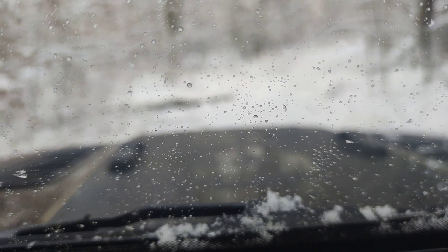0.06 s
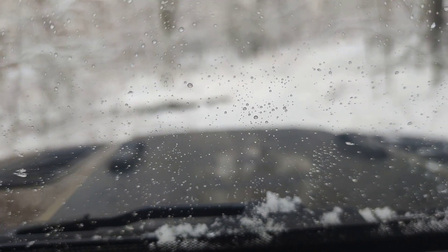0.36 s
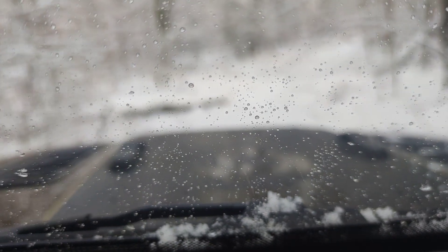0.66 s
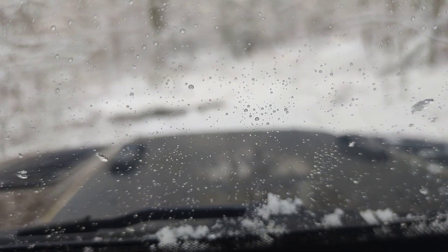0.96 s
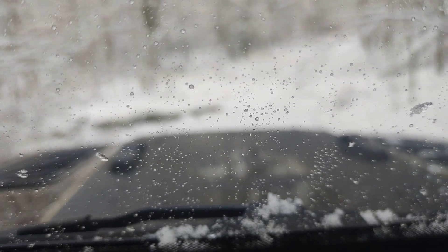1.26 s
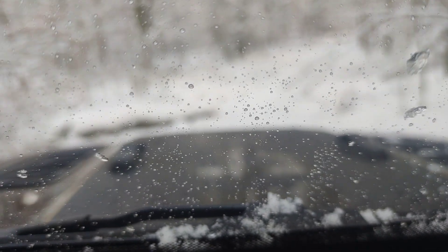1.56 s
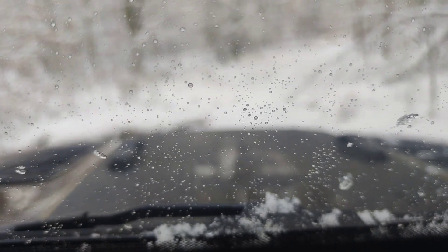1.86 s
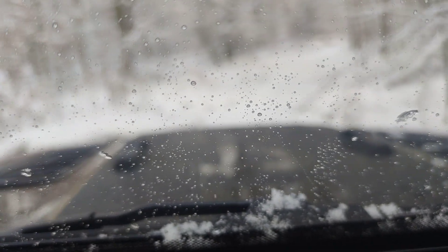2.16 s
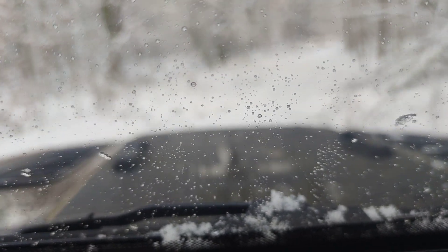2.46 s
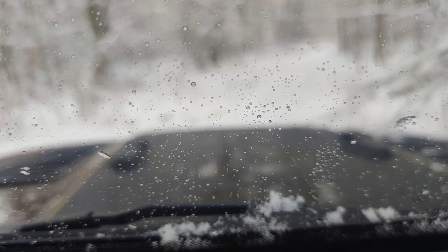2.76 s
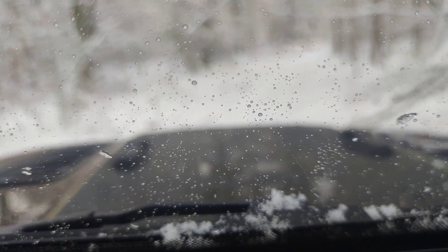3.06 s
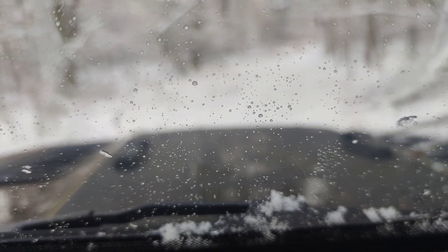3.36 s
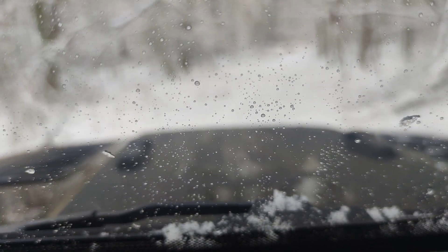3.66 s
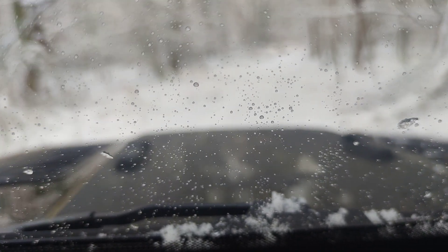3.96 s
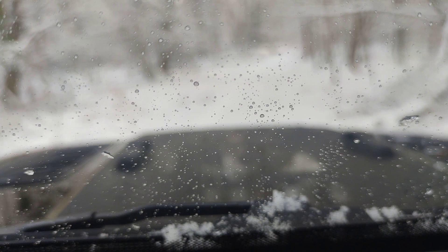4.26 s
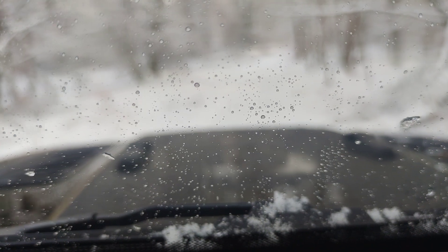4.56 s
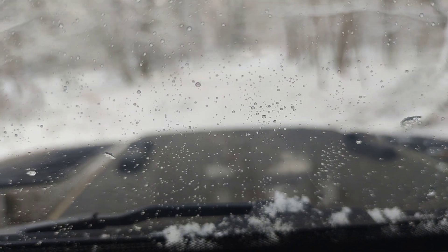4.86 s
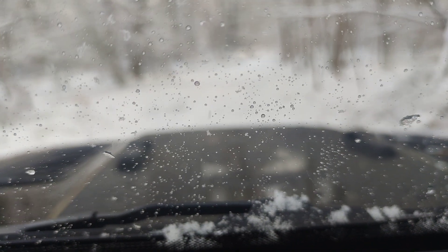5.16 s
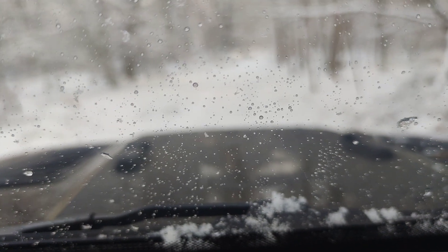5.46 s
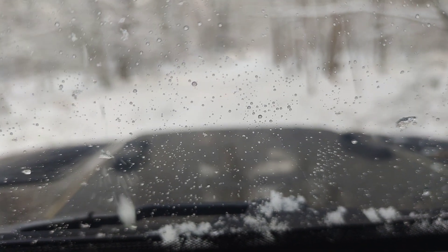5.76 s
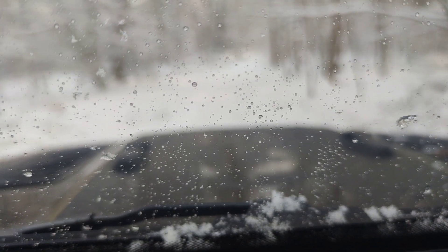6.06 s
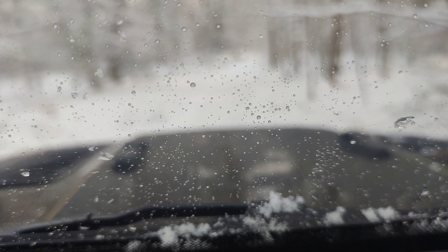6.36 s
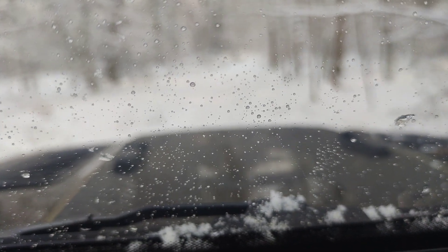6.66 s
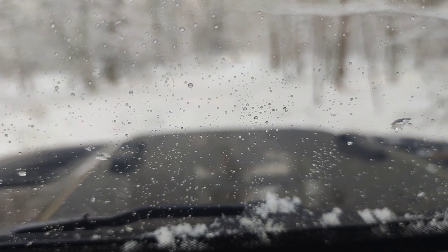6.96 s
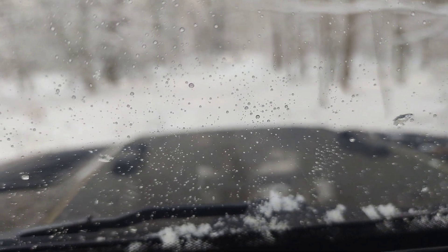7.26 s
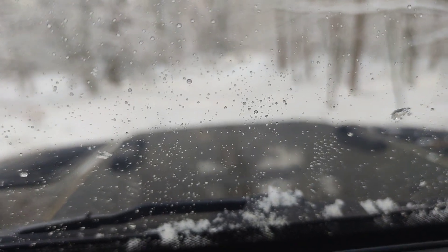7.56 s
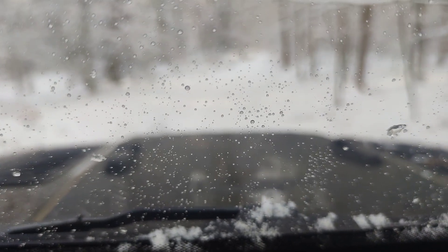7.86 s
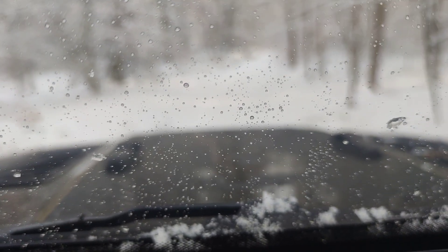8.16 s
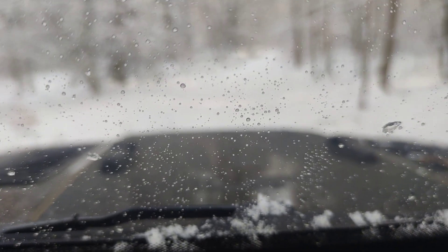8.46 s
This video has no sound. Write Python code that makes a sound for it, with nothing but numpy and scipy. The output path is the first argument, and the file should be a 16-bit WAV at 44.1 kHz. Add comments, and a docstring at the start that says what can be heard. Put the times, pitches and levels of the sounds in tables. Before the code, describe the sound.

Snow-laden branches swish and scrape along a slow truck, with ice ticking on the windscreen and sticks knocking on the panels. After this loud opening, twigs clatter in irregular bursts over a low engine drone, chassis rumble and the muffled crunch of tyres on snow. Towards the end the slaps grow sparse and the engine rises slightly twice. The microphone is inside the cab, on a forest track.

```python
"""A snowy forest track, heard from the dashboard inside the cab of a crawling truck.
The engine drones and revs briefly twice near the end; the chassis rumbles and the tyres crunch snow.
Snow-laden branches sweep over the body, ice ticks on the glass, and twigs, soft blows and sticks
strike the panels. The stereo microphone has two ports, each with its own treble resonance."""
import sys
import numpy as np
from scipy import signal
from scipy.fft import rfft, irfft, next_fast_len
from scipy.io import wavfile
from scipy.ndimage import uniform_filter1d, map_coordinates

SR = 44100
rng = np.random.default_rng(int(sys.argv[2]) if len(sys.argv) > 2 else 0)


def store_pcm(level_fs):
    """Save levels as 16-bit WAV."""
    pcm = np.round(np.clip(level_fs, -1, 1) * 32767).astype(np.int16)
    wavfile.write(sys.argv[1], SR, np.atleast_2d(pcm).T)


N = 375732

# Thickness of the brush. Each row: time in seconds, branch scrape in dB, snow hiss in dB.
BRUSH_THICKNESS = [(0, -35.5, -37), (.6, -35.5, -32.5), (1.3, -38.5, -28), (1.4, -45, -38), (1.6, -43, -38),
                   (1.85, -52, -42.5), (2.4, -59.5, -53), (2.75, -58, -50.5), (3.1, -60, -57),
                   (4.1, -52.5, -49.5), (4.7, -39, -47.5), (5.05, -48, -55), (5.6, -48.5, -52),
                   (6.4, -50.5, -47.5), (7.9, -50.5, -53), (8.1, -54.5, -48.5), (8.52, -55, -56.5)]


def amp(db):
    """Decibels to gain."""
    return 10 ** (np.asarray(db) / 20)


def along(points, hz):
    """Read (Hz, value) points on a log frequency axis."""
    freqs, values = np.transpose(points)
    return np.interp(np.log(hz + 1), np.log(freqs + 1), values)


def curves(rows):
    """One value per sample for each column after the time."""
    times, *columns = np.transpose(rows)
    return [np.interp(np.arange(N) / SR, times, column) for column in columns]


def wobble(rate):
    """A smooth random curve, rate knots a second."""
    coarse = np.arange(0, N, 64)
    knots = rng.standard_normal(size=1024)
    return np.interp(np.arange(N), coarse, map_coordinates(knots, [coarse * rate / SR], mode="wrap"))


def swell(peak_s, half_length_s):
    """A bell-shaped rise and fall of height 1."""
    offset = (np.arange(N) / SR - peak_s) / half_length_s
    return np.exp(-offset ** 2 / 2) * (np.abs(offset) < 5)


def add(out, start_s, sound):
    """Mix a sound in from start_s on."""
    part = out[:, max(round(start_s * SR), 0):][:, :sound.shape[-1]]
    part += sound[:, :part.shape[-1]]


def filtered(x, response):
    """Pass x through a response given as a function of Hz."""
    n = x.shape[-1]
    size = next_fast_len(n + 4096)
    return irfft(rfft(x, size) * response(np.fft.rfftfreq(size, 1 / SR)), size)[..., :n]


def port_lag(hz, lag_s=0.000435):
    """Sound reaches the right microphone port a little before the left."""
    return np.exp(np.pi * 1j * hz * lag_s * np.array([[-1], [1]]))


def port_spectra(pair, hz):
    """Mix two unrelated spectra to the ports: bass is shared, treble is diffuse."""
    # Likeness of the two ports. Each row: frequency in Hz, left-right correlation.
    likeness = [(40, 1), (120, 0.96), (250, 1), (500, 0.79), (1000, 0.24), (2000, 0.04), (5000, 0.011)]
    angle = np.arccos(np.clip(along(likeness, hz), -1, 1)) / 2
    shared, diffuse = pair * [np.cos(angle), np.sin(angle)]
    return np.array([shared + diffuse, shared - diffuse]) * port_lag(hz)


def in_cab(pair, spectrum):
    """Colour two unrelated signals and bring them to the ports; the mid signal has rms 1."""
    n = pair.shape[-1]
    size = next_fast_len(n, real=True)
    hz = np.fft.rfftfreq(size, 1 / SR)
    ports = irfft(port_spectra(rfft(pair, size), hz) * amp(along(spectrum, hz)), size)[:, :n]
    return ports / np.std(ports.mean(axis=0))


def patchy(depth_db, size=256):
    """Two noises whose colour shifts as the points of contact move."""
    frames = signal.stft(rng.standard_normal((2, N)), nperseg=size)[2]
    patches = uniform_filter1d(rng.standard_normal(frames.shape[1:]), size=4, axis=0)
    patches = uniform_filter1d(patches, size=8, axis=1)
    patches /= np.sqrt(np.mean(patches ** 2))
    return signal.istft(frames * amp(depth_db * patches), nperseg=size)[1][:, :N]


def grains(rate, spread_db, t60, share):
    """Envelope of rms 1: tiny dying impacts carry a share of the power, a steady bed the rest."""
    hits = rng.random(N) < rate / SR
    strength = amp(spread_db * np.minimum(rng.exponential(size=N), np.pi))
    decay = amp(-60 * np.arange(SR // 8) / SR / t60)
    power = np.abs(signal.fftconvolve(hits * strength ** 2, decay ** 2)[:N])
    return np.sqrt(1 - share + share * power / power.mean())


def pedal(coast_db=-52, ramp_s=0.1):
    """Half the firing rate (Hz) and firing level (dB): each push holds the load up and may bend the revs."""
    # Cruising speed of the engine. Each row: time in seconds, half the firing rate in Hz.
    cruise = [(0, 66.87), (1.5, 66.2), (2.5, 66.1), (3.1, 67.9), (3.85, 68.2), (4.2, 65.34), (5.1, 64.78),
              (6.6, 64.17), (7.3, 64.17), (7.5, 59.2), (7.7, 63.88), (8.28, 65.9), (8.52, 65.8)]
    # Pedal pushes. Each row: start and end in seconds, added firing note in dB, speed change in Hz.
    pushes = [(-.1, 1, -43.5, 0.5), (.22, 0.53, -41, 1.5), (1.1, 4.5, -48.5, 0), (4.5, 4.95, -41, 0),
              (5.36, 5.83, -40, 2), (5.92, 6.86, -53, 0), (6.862, 7.3, -40.5, 6.5), (7.681, 8.2, -39.5, 7),
              (8.231, 8.9, -40.5, -1.5)]
    t = np.arange(N) / SR
    speed, note = curves(cruise)[0], amp(coast_db)
    for start, end, db, change_hz in pushes:
        load = np.clip(np.minimum(t - start, end - t) / ramp_s + .5, 0, 1)
        progress = np.clip((t - start) / (end - start), 0, 1)
        note = note + amp(db) * load
        speed = speed + change_hz * np.sin(np.pi * progress)
    return speed, 20 * np.log10(note)


def engine(firing_db=1.14, throb_db=-1.0, whine_db=0.5, rough_db=2.0, flutter_db=1.86,
           jitter_rad=0.054, whine_db_per_hz=0.2):
    """Eight cylinders fire four times a turn; their unevenness adds the other crank orders."""
    # Exhaust throb. Each row: time in seconds, level in dB.
    exhaust = [(0, -35.5), (.7, -45), (4, -42), (4.7, -38.5), (5.5, -36.5), (6.8, -37), (8.52, -44)]
    # Uneven firing. Each row: multiple of the crank rate, relative level in dB.
    crank_orders = [(1, 2.5), (2, 1), (3, -8), (5, -12), (6, -17), (7, -21), (8, -17), (9, -15.5),
                    (10, -25), (11, -30.5), (12, -30)]
    speed, note_db = pedal()
    low_db = curves(exhaust)[0] + throb_db
    high_db = note_db + whine_db + whine_db_per_hz * (speed - speed.mean())  # grows with load and speed
    crank = 2 * np.pi * np.cumsum(speed / 2) / SR + jitter_rad * wobble(22)
    sound = amp(note_db + firing_db + rough_db * wobble(30)) * np.sin(4 * crank)
    for order, db in crank_orders:
        level = amp((low_db if order < 6 else high_db) + db + flutter_db * wobble(5.7))
        sound += level * np.sin(order * crank + 2 * np.pi * rng.random())
    return np.sqrt(2) * sound


def wheels(rumble_db=-1, crunch_db=1):
    """Under the cab the chassis rumbles over ruts while the tyres pack snow in dull little collapses."""
    # Track roughness and single ruts. Each row: time in seconds, rumble in dB, crunch in dB.
    roughness = [(0, -29, -36.5), (1.5, -36, -36), (1.8, -46, -48.5), (2.6, -40, -51.5), (4.2, -44, -47),
                 (4.65, -35, -45.5), (5.7, -38, -41), (6.25, -40, -48), (7.1, -31.5, -44),
                 (7.5, -36.5, -46), (8.52, -36.5, -51)]
    ruts = [(.88, -34.5, -74), (2, -31, -51), (3.58, -33, -70), (4.62, -38, -44), (5.32, -35, -52),
            (5.97, -41, -38), (6.92, -37, -49.5), (7.85, -31.5, -62), (8.46, -29, -62)]
    # Chassis and tyre spectra. Each row: frequency in Hz, relative level in dB.
    rumble_spectrum = [(8, -3), (18, -1), (28, -2.5), (40, 1), (50, 0), (78, -9), (112, -12.5),
                       (165, -20.5), (260, -64), (500, -87)]
    crunch_spectrum = [(90, -19), (150, -2.5), (200, 0.5), (260, -3.5), (340, 0), (480, -7), (700, -13.5),
                       (1200, -23), (3000, -43)]
    shake, packing = amp(curves(roughness))
    for time, chassis_db, tyre_db in ruts:
        crossing = swell(time, half_length_s=0.065)
        shake += amp(chassis_db) * crossing
        packing += amp(tyre_db) * crossing
    rumble = in_cab(rng.standard_normal((2, N)), rumble_spectrum)
    collapses = patchy(depth_db=3, size=1024) * grains(rate=70, spread_db=-1, t60=0.079, share=0.57)
    crunch = in_cab(collapses, crunch_spectrum)
    return amp(rumble_db) * shake * rumble + amp(crunch_db) * packing * crunch


def branches(scrape_db=2.5, hiss_db=1, pressure_depth_db=-0.24):
    """Twigs drag over the paint in small catches and shed a spray of snow; whole boughs swell and pass."""
    # Passing boughs. Each row: peak time in seconds, scrape in dB, spray in dB, half-length in seconds.
    boughs = [(0.255, -32, -25, 0.15), (0.488, -38, -34.5, 0.048), (1.068, -35.5, -30, 0.028),
              (1.244, -35.5, -53, 0.042), (1.543, -37, -28.5, 0.041), (1.647, -46, -33.5, 0.015),
              (1.719, -34, -59, 0.0096), (1.855, -52, -30, 0.0093), (2.065, -41, -33, 0.018),
              (2.184, -43.5, -34, 0.037), (2.897, -33.5, -33.5, .011), (3.312, -47, -40, 0.017),
              (4.394, -51, -60, 0.079), (5.067, -40.5, -59, 0.014), (5.245, -42.5, -42.5, 0.018),
              (5.402, -39, -48, 0.023), (5.957, -42, -59, 0.041), (6.195, -40, -56, 0.019),
              (6.336, -37, -58, .012), (6.746, -42.5, -59, 0.029), (7.239, -35.5, -46, 0.033),
              (8.31, -48, -39, 0.017)]
    # Branch and snow spectra. Each row: frequency in Hz, relative level in dB.
    scrape_spectrum = [(250, -2), (500, -3), (800, -2), (1300, -0.5), (2000, -3), (3000, -4), (5000, -10.5),
                       (9000, -16), (16000, -20)]
    hiss_spectrum = [(800, -46), (2000, -11), (3500, -2.5), (6000, -4), (8000, 2.5), (10000, -1),
                     (13000, -1.5), (16000, 1)]
    twig_db, snow_db = curves(BRUSH_THICKNESS)
    pressure_db = pressure_depth_db * wobble(22)
    drag = amp(twig_db + scrape_db + pressure_db)
    spray = amp(snow_db + hiss_db + pressure_db / 2)
    for time, drag_db, spray_db, half_length in boughs:
        contact = swell(time, half_length)
        drag += amp(drag_db) * contact
        spray += amp(spray_db) * contact
    catches = patchy(depth_db=3, size=512) * grains(rate=130, spread_db=3.5, t60=0.067, share=0.71)
    powder = patchy(depth_db=2.5) * grains(rate=280, spread_db=9.5, t60=0.079, share=0.34)
    return drag * in_cab(catches, scrape_spectrum) + spray * in_cab(powder, hiss_spectrum)


def glass_ticks(level_db=-13, follow=0.76):
    """Stray twig tips and crumbs of ice tick on the glass, harder in thick brush."""
    # Spectrum of the ticks. Each row: frequency in Hz, relative level in dB.
    tick_spectrum = [(500, -44), (1300, -18), (2500, -10), (6000, -1.5), (9000, 2), (16000, -1)]
    snow_db = curves(BRUSH_THICKNESS)[1]
    noise = in_cab(patchy(depth_db=4.5), tick_spectrum)
    ticks = noise * grains(rate=22, spread_db=-2.0, t60=0.1, share=1)
    return amp(level_db + follow * snow_db) * ticks


def panel_ring(bands, size, uneven_db=2.0, spacing_hz=260):
    """Dense panel modes in (dB, spectrum) bands, with new peaks for every spot that is struck."""
    hz = np.fft.rfftfreq(size, 1 / SR)
    peaks = rng.standard_normal(size=512)
    ripple_db = uneven_db * np.interp(hz / spacing_hz, np.arange(len(peaks)), peaks)
    modes = port_spectra(rfft(rng.standard_normal((2, size))), hz) * amp(ripple_db)
    mid, colour = np.abs(modes.mean(axis=0)), 0
    for db, spectrum in bands:
        gain = amp(along(spectrum, hz))
        colour = colour + amp(db) * gain / np.linalg.norm(mid * gain)
    return irfft(modes * colour, size) * size / np.sqrt(2)


def twigs(knock_db=3, clack_db=2.5, snap_db=3, crack_db=3, crack_t60=0.0075,
          cab_db=-20, cab_t60=0.15, crumble_db=2.0, attack_s=0.0011):
    """Each slap is a short crack, a crumbling rattle of twig tips on the panel and a faint cab echo."""
    # Twig slaps. Each row: start in seconds, knock, clack and snap in dB, rattle t60 in seconds.
    slaps = [(.104, -49, -37.5, -31, 0.61), (.16, -46, -27, -35, .3), (.238, -27.5, -31, -33, .09),
             (.361, -52, -22.5, -33, 0.13), (.447, -45, -29, -24.5, 0.15), (.574, -35, -39, -34, 0.56),
             (.654, -29.5, -41, -37, .09), (.769, -43, -53, -27, 0.06), (1.032, -42, -27, -23.5, .04),
             (1.043, -49, -36, -21, 0.055), (1.09, -28.5, -45, -34, 0.14), (1.403, -56, -40, -33, 0.41),
             (1.439, -32.5, -26, -21.5, .11), (1.48, -36, -24.5, -18.5, .1),
             (1.9, -41.5, -42.5, -30.5, 0.12), (2.097, -35.5, -51, -36.5, 0.12),
             (2.166, -47, -40.5, -31.5, 0.2), (2.275, -45.5, -43, -25, 0.07),
             (2.837, -37.5, -43, -31, 0.071), (2.897, -45, -54, -32, 0.17), (2.967, -48, -50.5, -39, 0.1),
             (3.247, -64, -44.5, -44, 0.072), (3.344, -37, -35.5, -44, 0.13), (3.363, -49, -38, -38, 0.15),
             (3.402, -44, -31.5, -45, 0.14), (3.432, -42, -34, -36, 0.052), (3.463, -43.5, -44, -48, 0.18),
             (3.637, -33.5, -39.5, -46, 0.08), (3.694, -53, -54, -37, 0.33), (3.794, -48, -41, -30.5, 0.12),
             (3.914, -51, -69, -31, 0.094), (4.044, -37, -44, -54, 0.072), (4.188, -34.5, -48, -40, 0.08),
             (4.218, -43, -37, -35, 0.082), (4.247, -31.5, -35.5, -55, 0.11), (4.389, -33, -30, -43, 0.051),
             (4.414, -51, -26, -36.5, 0.042), (4.433, -37.5, -36, -27, 0.068),
             (4.534, -37, -30, -25, 0.082), (4.573, -31, -24, -25.5, 0.086), (4.626, -60, -32, -36.5, .13),
             (4.708, -51, -44, -40, 0.23), (4.827, -37.5, -33, -46, .12), (4.878, -45, -40, -43, 0.17),
             (5.344, -39, -46, -40.5, 0.24), (5.409, -38, -45, -36, 0.11), (5.45, -42, -37.5, -51, 0.2),
             (5.537, -64, -38, -39, 0.078), (6.114, -37, -40, -38, 0.077), (6.248, -41, -40, -35, 0.11),
             (6.372, -37, -36.5, -45, 0.094), (6.675, -50, -43.5, -41.5, 0.14),
             (6.829, -40.5, -41, -35.5, .07), (6.899, -60, -60, -35, 0.034), (7.068, -36.5, -38, -39, 0.15),
             (8.356, -50, -46.5, -36, 0.19)]
    # Low, middle and high bands of a slap. Each row: frequency in Hz, relative level in dB.
    knock_band = [(120, -12), (300, 2.5), (700, -4), (1200, -3), (2500, -25)]
    clack_band = [(600, -51), (1300, -9.5), (2100, 1.5), (3300, 0), (6000, -14.5)]
    snap_band = [(1800, -45.5), (3800, -3), (6500, 2), (8500, 3.5), (11000, -1.5), (16000, -6)]
    out, t = np.zeros((2, N)), np.arange(8192) / SR
    crack = amp(crack_db - 60 * t / crack_t60)
    echo = amp(cab_db - 60 * t / cab_t60)
    onset = 1 - np.exp(-t / attack_s)
    for start, knock, clack, snap, t60 in slaps:
        bands = [(knock + knock_db, knock_band), (clack + clack_db, clack_band),
                 (snap + snap_db, snap_band)]
        ring = panel_ring(bands, size=len(t))
        crumble = amp(crumble_db * map_coordinates(rng.standard_normal(size=128), [t * 300], order=1))
        rattle = crumble * amp(-60 * t / t60)
        add(out, start, ring * (crack + rattle + echo) * onset)
    return out * amp([[-0.5], [0.5]])  # slightly right of centre


def resonance(hz, t, skirt_db):
    """Noise ringing in one broad resonance at hz, falling away in steps of skirt_db to each side."""
    shape = [(hz / 3, 4 * skirt_db), (hz * 0.77, skirt_db), (hz, 0),
             (hz * 1.16, skirt_db), (hz * 2.35, 2 * skirt_db), (hz * 6, -60)]
    return in_cab(rng.standard_normal((2, len(t))), shape)


def bumps(attack_s=0.0047, t60=0.12, thud_db=-3, groan_db=-1, waver_rad=0.45):
    """Soft blows thud against the body, and a large panel groans briefly at its own low pitch."""
    # Blows to the body and wheels. Each row: start in seconds, level in dB, pitch in Hz.
    blows = [(.241, -20, 204), (.4, -17, 438), (1.002, -18.5, 191), (1.195, -21, 208), (1.269, -18.5, 208),
             (1.358, -23.5, 306), (2.058, -23, 190), (3.635, -29, 387.8), (4.188, -28.5, 453),
             (4.745, -24, 341), (5.19, -26, 340), (5.586, -22, 336.5), (6.83, -26, 221),
             (8.446, -30.5, 299)]
    out, t = np.zeros((2, N)), np.arange(SR // 5) / SR
    onset = 1 - np.exp(-t / attack_s)
    for start, db, hz in blows:
        drift = waver_rad * map_coordinates(rng.standard_normal(size=32), [t * 70])
        groan = amp(groan_db) * np.sin(2 * np.pi * hz * t + drift)
        thud = amp(thud_db) * resonance(hz, t, skirt_db=-10)
        add(out, start, amp(db - 60 * t / t60) * onset * (thud + groan))
    return out


def sticks(crack_db=4, crack_t60=0.017, attack_s=0.002):
    """A thicker stick hits a panel with a hard, woody crack and rings briefly at its own pitch."""
    # Stick strikes. Each row: start in seconds, level in dB, pitch in Hz, ring t60 in seconds.
    strikes = [(.363, -24, 2450, 0.15), (1.44, -17.5, 2350, 0.053), (3.4063, -24, 610, 0.054),
               (3.4312, -18.5, 2500, 0.05), (3.861, -31, 2860, .08), (4.581, -24, 2230, 0.098),
               (4.588, -26.5, 786, .08), (5.152, -33, 2480, .075), (5.408, -20, 1980, 0.033),
               (5.41, -27.5, 650, 0.053), (5.588, -33, 530, .05), (5.601, -28.5, 665, 0.068),
               (6.943, -31.5, 1140, 0.11), (7.002, -33.5, 1300, 0.12)]
    out, t = np.zeros((2, N)), np.arange(SR // 8) / SR
    onset = 1 - np.exp(-t / attack_s)
    for start, db, hz, t60 in strikes:
        fade = amp(crack_db - 60 * t / crack_t60) + amp(-60 * t / t60)
        add(out, start, amp(db) * fade * onset * resonance(hz, t, skirt_db=-9))
    return out


def scene():
    """Everything as it reaches the dashboard."""
    drone = filtered(engine(), port_lag)
    return drone + wheels() + branches() + glass_ticks() + twigs() + sticks() + bumps()


def record(dry, top_hz=15850):
    """Each microphone port colours the treble in its own way; nothing is kept above top_hz."""
    # Responses of the two ports. Each row: frequency in Hz, gain in dB.
    left_port = [(200, 0.87), (1000, 0), (3000, -4), (5200, -3.5), (6800, -2), (7600, 3.5), (8100, 6.5),
                 (8900, -3), (10500, -10.5), (13000, -16.5), (16000, -20)]
    right_port = [(200, 0.4), (1000, 0), (3000, -2.5), (5200, 0.5), (6500, 2.5), (7450, 2.5), (8200, -3.5),
                  (8950, -10), (10500, -8), (13000, -8), (16000, -10)]
    return filtered(dry, lambda hz: amp([along(left_port, hz), along(right_port, hz)]) * (hz < top_hz))


dry = scene()
out = record(dry)
store_pcm(out)
```